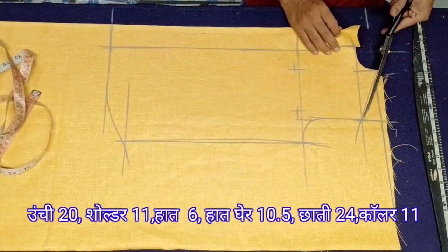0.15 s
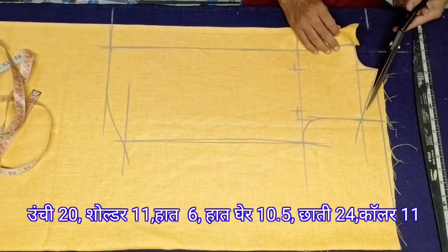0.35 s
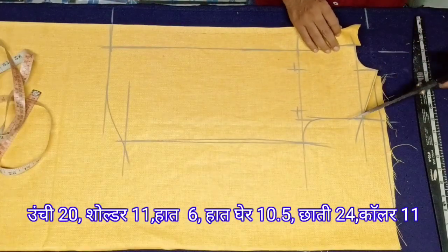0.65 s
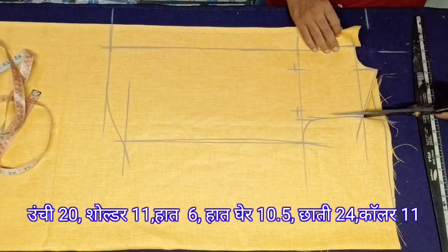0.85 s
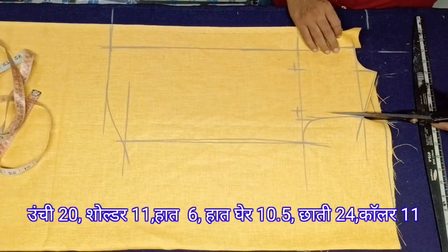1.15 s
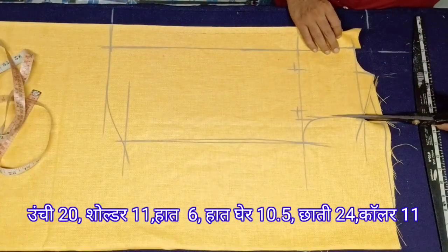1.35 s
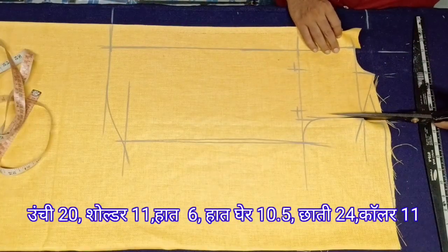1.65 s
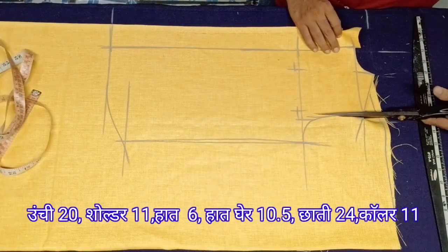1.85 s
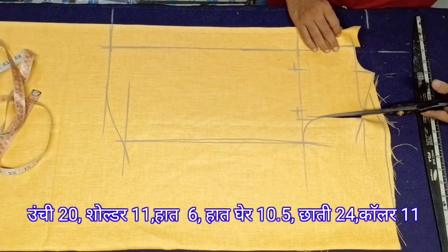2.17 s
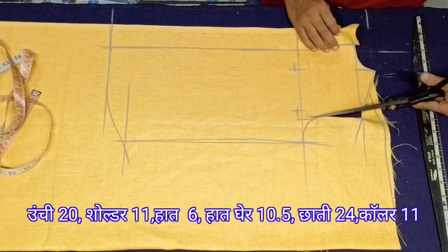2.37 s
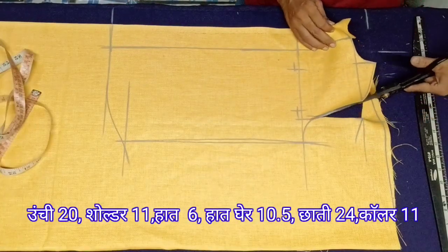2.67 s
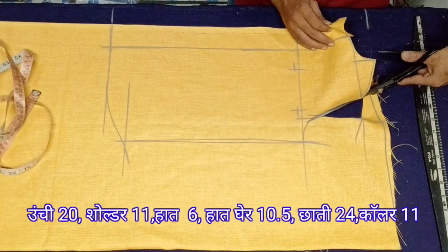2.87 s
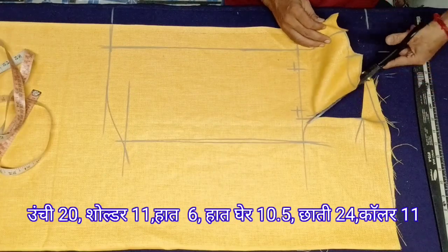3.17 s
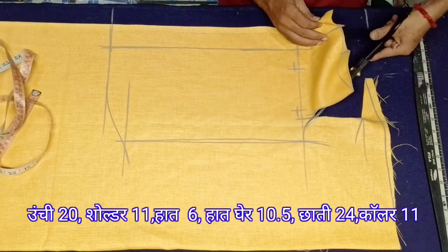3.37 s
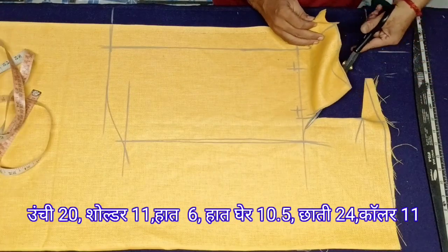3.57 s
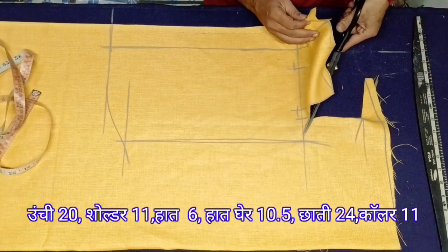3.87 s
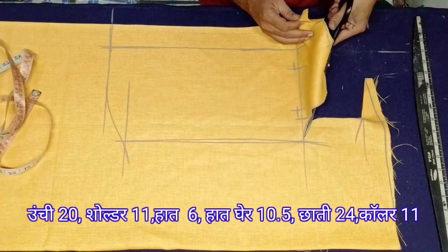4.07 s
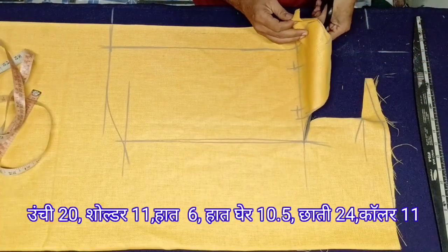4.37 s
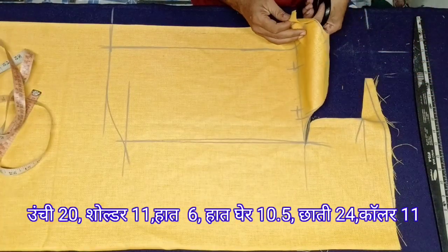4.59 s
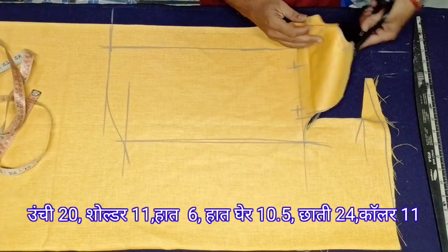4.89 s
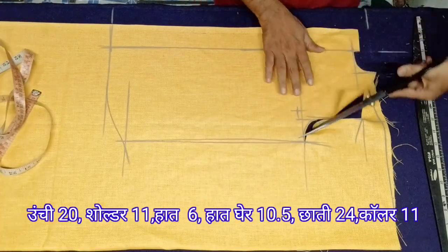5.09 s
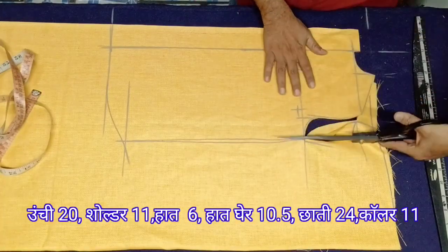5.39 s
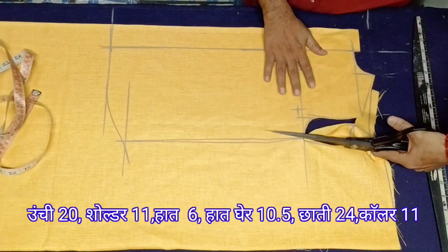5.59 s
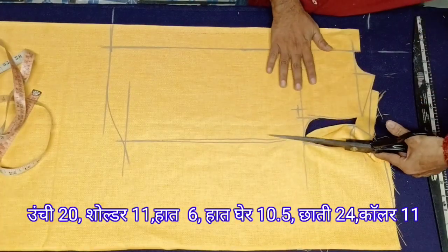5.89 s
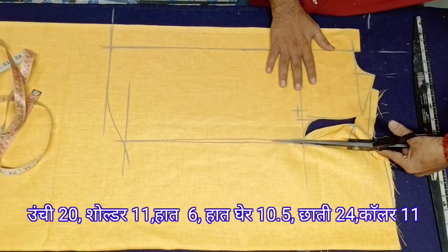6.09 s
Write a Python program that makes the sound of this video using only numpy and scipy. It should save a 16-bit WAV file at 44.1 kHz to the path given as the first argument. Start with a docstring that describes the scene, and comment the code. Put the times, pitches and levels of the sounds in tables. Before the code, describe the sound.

Large shears crunch through cloth on a wooden table, about two snips a second, with blade scrapes and low knocks.

```python
"""Crunching snips, about two a second: large tailor's shears cut cloth on a wooden table in a small room.
Threads snap in bunches and ring the blades and the board under them; the shears knock shut and
scrape open again. The table rumbles and a hollow rub swells as shears and hands move on it.
The second snip leaves a noisy tail; then a swirling wash, probably a passing vehicle, comes and
goes over faint room tone."""
import sys
import numpy as np
from scipy import signal
from scipy.fft import rfft, irfft
from scipy.io import wavfile
from scipy.ndimage import uniform_filter1d, map_coordinates

SR = 44100
rng = np.random.default_rng(int(sys.argv[2]) if len(sys.argv) > 2 else 0)


def int16_out(signal):
    """Quantize to a 16-bit WAV file."""
    q = np.round(np.clip(np.atleast_2d(signal).T, -1, 1) * 32767)
    wavfile.write(sys.argv[1], SR, q.astype(np.int16))


N = 275184
T = np.arange(N) / SR
RING = T[:SR // 3]  # time axis of one short event
SQUEEZE_PEAK_S, USUAL_BITE_HZ = 0.06, 555

# modes of the wooden table top: f/Hz, level/dB, t60/s
BOARD_MODES = [(161, -1.5, 0.15), (228, -5.5, 0.061), (317.4, 0.5, 0.16), (386.2, 2, 0.1),
               (538.4, -2.5, 0.088), (605, 4, 0.075), (653.4, -2.5, 0.12), (818, -2.5, 0.051),
               (859, -8, 0.066), (920, -5, 0.14), (989.4, 3, 0.079), (1083, 3.5, 0.0248),
               (1497, -10, 0.022)]
# modes of the steel blades: f/Hz, level/dB, t60/s
BLADE_MODES = [(2130, -7.5, 0.14), (2423, 10, 0.021), (2680, -1, 0.078), (3446, 6.5, 0.043),
               (3820, 11, 0.019), (4400, 4, 0.052), (4860, 0, 0.04), (5330, 7.5, 0.028), (5720, 3.5, 0.083),
               (7050, 7.5, 0.016), (7100, -2, 0.0093)]


def undb(db):
    """Decibels to gain."""
    return 10 ** (np.asarray(db) / 20)


def unit(x):
    """Scale to rms 1."""
    return x / np.sqrt(np.mean(x ** 2))


def punch(x):
    """Scale so that the loudest hundredth of a second has rms 1."""
    return x / np.sqrt(uniform_filter1d(x ** 2, SR // 100).max())


def add(out, s, x):
    """Mix x into out at time s."""
    i = int(s * SR)
    x, i = x[max(-i, 0):], max(i, 0)
    out[i:i + len(x)] += x[:N - i]


def gains(rows):
    """One gain curve for each level column; they fade in before the first row."""
    s, *columns = np.transpose(rows)
    fade_db = -90 * np.maximum(s[0] - T, 0)
    return [undb(np.interp(T, s, db) + fade_db) for db in columns]


def walk(per_s):
    """Slow random wandering with a spread near 1."""
    count = int(T[-1] * per_s) + 2
    return np.interp(T * per_s, np.arange(count), rng.standard_normal(count))


def colour(x, points, size=4096):
    """Minimum-phase EQ through points of f/Hz, level/dB."""
    hz, db = np.transpose(points)
    curve_db = np.interp(np.log(np.fft.rfftfreq(size, 1 / SR) + 1), np.log(hz), db)
    cepstrum = irfft(np.log(undb(curve_db)))
    cepstrum[1:size // 2] *= 2
    cepstrum[size // 2 + 1:] = 0
    return signal.fftconvolve(x, irfft(np.exp(rfft(cepstrum))))[:len(x)]


def band(x, lo_hz, hi_hz, order=2):
    """Band-pass."""
    sos = signal.butter(order, [lo_hz, min(hi_hz, SR / 2 - 1)], "band", fs=SR, output="sos")
    return signal.sosfilt(sos, x)


def ring(push, modes, scatter_db, detune=0.0069):
    """Ring the modes; each place of contact weights and detunes them anew."""
    hz, db, t60 = np.transpose(modes)[:, :, None]
    hz = hz * (1 + detune * rng.standard_normal(hz.shape))
    weight = undb(db + scatter_db * rng.standard_normal(hz.shape)) * rng.choice([-1, 1], hz.shape)
    response = np.sum(weight * np.sin(2 * np.pi * hz * RING) * 1000 ** (-RING / t60), axis=0)
    return signal.fftconvolve(push, response)[:len(push)]


def room(x, t60_s=0.18, wet_db=-9.5):
    """Direct sound and the short tail of a small room, which swallows the highest treble."""
    tail = band(rng.standard_normal(len(RING)), 14, 9700) * undb(-60 * RING / t60_s) * (RING > .004)
    return x + undb(wet_db) * signal.fftconvolve(x, tail / np.linalg.norm(tail))[:len(x)]


def slips(force, per_s, scatter_db):
    """Tiny releases of tension at random moments, sized by the force."""
    size = len(force)
    impulses = (rng.random(size) < per_s / SR) * rng.choice([-1, 1], size)
    return force * impulses * undb(scatter_db * rng.standard_normal(size))


def stroke(length, rise_s, fall_s, t=RING):
    """Envelope of a short slide: it swells, holds and dies away."""
    return (1 - np.exp(-(t / rise_s) ** 2)) * np.exp(-np.maximum(t - length, 0) / fall_s)


def squeeze(width_s, peak_s=SQUEEZE_PEAK_S):
    """Force that mounts and gives way, as when threads bunch up between the edges."""
    return 1 / np.cosh(np.minimum(np.abs(RING - peak_s) / width_s, 20))


def steel(snaps, blade_db):
    """Snaps crack in the air and ring the blades; harder ones crack brighter."""
    # spectrum of a snap: f/Hz, level/dB
    snap_eq = [(700, 3.5), (1300, 3.5), (1800, -10), (2400, 5.5), (3050, -15.5), (3800, -1.5), (5500, -5),
               (7000, 2), (7900, -16.5), (8700, -9.5), (10900, -11.5), (13000, -24.5), (14800, -29)]
    top_hz = 13000 * undb(0.81 * (blade_db + 46.5))
    crack = band(colour(snaps, snap_eq), 350, top_hz, order=4)
    blades = ring(snaps, BLADE_MODES, scatter_db=5.5, detune=.004)
    return undb(blade_db) * punch(room(unit(blades) + undb(4) * unit(crack)))


def bite(cut, tug, board_db, blade_db, hz):
    """Snapping threads ring the steel; their tugs shake the board, damped by the lower blade."""
    damped_modes = [(f, db, t60 * 0.9) for f, db, t60 in BOARD_MODES]
    wood = ring(slips(tug, per_s=1800, scatter_db=1), damped_modes, scatter_db=5.5)
    board = punch(room(band(wood, hz * 0.66, hz * 1.576, order=3)))
    body_db = -9.5 - 18.5 * np.log2(hz / USUAL_BITE_HZ)  # brighter bites have less low end
    body = undb(body_db) * punch(band(wood, 59, 207, order=3))
    snaps = slips(cut, per_s=2600, scatter_db=2.5)
    return undb(board_db) * (board + body) + steel(snaps, blade_db)


def sing(rub, tilt_db=0, rise_per_s=0.58):
    """Light contact of the edges rings the high modes, which rise in pitch as the contact travels."""
    # high blade modes, run twice in series: f/Hz, level/dB, t60/s
    high_modes = [(6294, 2, 0.014), (6800, 1.5, 0.011), (9830, -2, 0.012), (10510, 6, 0.0052)]
    tilted = [(hz, db + tilt_db * np.log2(hz / high_modes[0][0]), t60) for hz, db, t60 in high_modes]
    edge = ring(rub, high_modes, scatter_db=1, detune=0.004)
    rung = ring(edge, tilted, scatter_db=1, detune=0.004)
    quickening_time = RING + rise_per_s * RING ** 2 / 2
    return punch(map_coordinates(rung, [quickening_time * SR]))


def cutting(bite_s=0.017):
    """The edges sing and crunch through single threads; bunches of threads give way in hard bites."""
    # the shears close: t/s, closing time/s, board/dB, blades/dB, singing/dB, its tilt/(dB per octave)
    closings = [(-.02, 0.086, -37.5, -51.5, -71, 7), (1.328, 0.2, -39, -62, -57.5, 13),
                (1.928, 0.11, -44.5, -65, -75.5, 10), (2.408, 0.091, -45, -54.5, -67, -11),
                (2.912, 0.11, -45.5, -60, -67, -5), (3.41, 0.13, -60, -58.5, -68, -4),
                (3.93, 0.12, -47, -60.5, -66, -6), (4.379, 0.068, -48.5, -57.5, -76, -2),
                (5.934, 0.18, -45, -64.5, -55, -12)]
    # bunches of threads give way: t/s, board/dB, blades/dB, board brightness/Hz
    bites = [(.035, -56, -52.5, 486), (.069, -28, -42.5, 554), (1.372, -41, -65, 505),
             (1.443, -36.5, -53, 570), (1.489, -33.5, -48.5, 520), (1.519, -31.5, -43.5, 478),
             (1.95, -38.5, -64, 716), (1.994, -39, -53, 640), (2.038, -33, -48, 607),
             (2.065, -40.5, -50, 570), (2.475, -39, -50.5, 695), (2.529, -34.5, -44.5, 576),
             (2.951, -42.5, -51.5, 553), (3.008, -43, -48, 466), (3.037, -39, -48.5, 440),
             (3.46, -46, -52.5, 577), (3.515, -47, -47.5, 599), (3.545, -43, -47, 507),
             (3.99, -38, -49, 570), (4.039, -34, -44, 538), (4.457, -32.5, -43, 500),
             (4.479, -30.5, -44.5, 434), (5.965, -39, -56, 693), (5.982, -48.5, -70, 1750),
             (6.005, -41.5, -55, 550), (6.046, -37, -50, 594), (6.091, -39, -42, 600)]
    out = np.zeros(N)
    for s, closing_s, board_db, blade_db, singing_db, tilt_db in closings:
        force = stroke(closing_s, rise_s=0.02, fall_s=0.021)
        contact = stroke(closing_s * 0.51, rise_s=0.0069, fall_s=0.016)
        rub = slips(contact, per_s=6000, scatter_db=8.5)
        crunch = bite(force, force, board_db, blade_db, USUAL_BITE_HZ)
        add(out, s, crunch + undb(singing_db) * sing(rub, tilt_db))
    for s, board_db, blade_db, hz in bites:
        cut = squeeze(bite_s * 0.28)
        tug = squeeze(bite_s * 0.26, peak_s=SQUEEZE_PEAK_S - .006)  # just ahead of the cut
        add(out, s - SQUEEZE_PEAK_S, bite(cut, tug, board_db, blade_db, hz))
    return out


def room_tone(level_db=-73.5):
    """A faint, steady bed of dark noise."""
    # spectrum of the room's air: f/Hz, level/dB
    air_eq = [(30, -4), (250, -6), (700, -15), (1500, -18), (2500, -29), (9000, -38), (15000, -39)]
    return undb(level_db) * unit(colour(rng.standard_normal(N), air_eq))


def knocks():
    """The handles meet with a click and press the closed shears on the padded table."""
    # the shears knock shut: t/s, thud/dB, brightness/Hz, steel click/dB
    hits = [(0.102, -20.5, 263, -48), (1.53, -39, 310, -52.5), (3.04, -40.5, 209, -74),
            (4.053, -36.5, 394, -64), (4.486, -29, 230, -70), (6.099, -39, 204, -67)]
    out = np.zeros(N)
    for s, db, hz, click_db in hits:
        push = RING * np.exp(-RING / 0.001)
        thud = band(ring(push, BOARD_MODES, scatter_db=2), hz * .5, hz * 2.6)
        chatter = slips(stroke(.002, rise_s=0.00098, fall_s=0.0044), per_s=4600, scatter_db=3)
        add(out, s, undb(db) * punch(room(thud)) + steel(chatter, click_db))
    return out


def table_rumble():
    """Steel sticks and slips on the cloth and stirs the low modes; thumps sway the whole top."""
    # the shears are shoved over the padded table: t/s, length/s, level/dB
    shoves = [(2.818, 0.18, -50), (3.221, 0.16, -47), (3.513, 0.18, -45), (3.9, 0.22, -52.5),
              (4.496, 0.098, -49)]
    # low thumps of the table (the first knock's boom, then hands leaning): t/s, level/dB
    thumps = [(0.13, -45), (1.567, -54), (2.619, -45), (3.294, -45.5), (3.852, -47), (5.059, -56)]
    low_modes = [(113.4, 3.5, 0.14), (144.3, 5.0, 0.29), (224.4, -12, 0.084)]  # f/Hz, level/dB, t60/s
    judder = slips(np.ones(N), per_s=220, scatter_db=5.5)
    drag = ring(judder, low_modes, scatter_db=3.5)
    speed = sum(undb(db) * stroke(length, rise_s=0.0043, fall_s=0.1, t=np.maximum(T - s, 0))
                for s, length, db in shoves)
    out = speed * unit(band(drag, 38, 260))
    for s, db in thumps:
        push = slips(squeeze(width_s=0.11), per_s=1000, scatter_db=2.5)
        sway = band(ring(push, [(58.3, 0, 0.25)], scatter_db=0), 83, 180)
        add(out, s - SQUEEZE_PEAK_S - .03, undb(db) * punch(sway))
    return out


def blade_echoes(rub, echo_s=.00178, shrink_per_s=0.78, reflect=0.64):
    """A rub echoes along the blade, ever sooner as the contact travels."""
    lag = echo_s * np.exp(-shrink_per_s * RING)
    return sum(reflect ** k * map_coordinates(rub, [(RING - k * lag) * SR]) for k in range(4))


def scraping():
    """Edge rubs on edge and makes the steel sing, while the lower blade is pushed over the table."""
    # the blades open or shift: t/s, scrape/dB, singing/dB, board/dB, length/s
    slides = [(0.276, -46.5, -66, -48, 0.02), (0.561, -75, -94.5, -67.5, 0.06),
              (1.303, -90, -75, -60.5, 0.0055), (1.641, -55, -71.5, -43, 0.04),
              (2.196, -70, -100, -50, 0.053), (2.677, -66, -85, -48.5, 0.024),
              (3.175, -69, -78.5, -54.5, 0.015), (3.668, -73, -76, -55.5, 0.012),
              (4.107, -69, -96, -48.5, 0.098), (4.693, -54.5, -69.5, -51, 0.0045),
              (5.804, -79, -70, -64.5, 0.12), (6.195, -49.5, -57.5, -60.5, 0.022)]
    # spectrum of edge on edge: f/Hz, level/dB
    scrape_eq = [(1200, -21.5), (2300, 18), (2850, 15), (3150, 1), (3500, 11.5), (4300, 5), (5650, 18.5),
                 (6250, 10.5), (6700, 9), (7600, -17), (10700, -8), (13000, -61)]
    # hollow colour of the board under a sliding blade: f/Hz, level/dB
    hollow_eq = [(220, -20.5), (410, -2), (520, -6), (860, -1), (1300, -31.5)]
    out = np.zeros(N)
    for s, scrape_db, singing_db, board_db, length in slides:
        rub = slips(stroke(length * .7, rise_s=.015, fall_s=.016), per_s=1800, scatter_db=4)
        rasp = unit(blade_echoes(colour(rub, scrape_eq)))
        blades = unit(ring(rub, BLADE_MODES, scatter_db=12))
        scrape = punch(room(rasp + undb(-14) * blades))
        push = slips(stroke(length, rise_s=0.013, fall_s=0.018), per_s=2000, scatter_db=6.5)
        wood = ring(push, BOARD_MODES, scatter_db=2, detune=0.032)
        board = punch(room(colour(wood, hollow_eq)))
        add(out, s, undb(scrape_db) * scrape + undb(singing_db) * sing(rub) + undb(board_db) * board)
    return out


def hollow_rub(core_hz=45, skirt_hz=180, broadens_db=-54):
    """A half-whistling rub: noise in one resonance that broadens as it grows louder."""
    # probably shears and cloth sliding over each other: t/s, level/dB, resonance/Hz
    glide = [(.38, -78.5, 1415), (0.509, -70, 1440), (.66, -60, 1462), (0.756, -58, 1468),
             (0.802, -64.5, 1463), (1.04, -83.5, 1460), (1.228, -62.5, 1493), (1.451, -52, 1564),
             (1.72, -76.5, 1243), (1.83, -58, 1110), (1.95, -87, 1100), (3.201, -65.5, 1182),
             (3.48, -56.5, 1577), (3.662, -62, 1405), (3.899, -67, 1036), (5.202, -100, 1486),
             (5.45, -76.5, 1463), (5.951, -86, 1468)]
    s, _, hz = np.transpose(glide)
    gain, = gains([row[:2] for row in glide])
    carrier = np.cos(2 * np.pi * np.cumsum(np.interp(T, s, hz)) / SR)
    core = unit(carrier * band(rng.standard_normal(N), 0.79, core_hz))
    skirt = unit(carrier * band(rng.standard_normal(N), 0.79, skirt_hz, order=4))
    breadth = np.sqrt(gain / undb(broadens_db))
    return gain * (core + breadth * skirt) / np.hypot(1, breadth)


def patchy(x, spread_db=3, per_s=9):
    """Each half octave swells and sinks on its own."""
    spectrum = rfft(x)
    half_octave = 2 * np.log2(np.fft.rfftfreq(N, 1 / SR) + 1)
    bands = (irfft(spectrum * np.maximum(1 - abs(half_octave - k), 0), N) for k in range(15, 28))
    return sum(undb(spread_db * walk(per_s)) * part for part in bands)


def swirling_wash(nearest_s=3.266, passing_s=1.465):
    """Noise swells in patches and swirls as dull echoes off ground and walls slide in delay."""
    # the second snip's noisy tail, then a wash, probably a passing vehicle: t/s, roar/dB, hiss/dB
    levels = [(1.6, -55, -70), (1.72, -55.5, -100), (2.0, -72.5, -66.5), (2.2, -58.5, -68.5),
              (2.65, -56.5, -62), (3.27, -53.5, -66.5), (3.62, -53, -60), (4.15, -54.5, -68.5),
              (4.58, -57.5, -65.5), (4.78, -72.5, -77.5), (5.8, -75, -89)]
    # spectrum of the wash: f/Hz, level/dB
    wash_eq = [(290, 7), (470, -8), (850, -0.5), (1500, -10), (2200, -12), (4000, -5), (6000, -14),
               (7500, -52.5)]
    roar_gain, hiss_gain = gains(levels)
    wash = patchy(colour(rng.standard_normal(N), wash_eq))
    nearness = 1 / np.hypot(1, (T - nearest_s) / passing_s)
    for share, lag_s in [(.7, .0012), (.55, .003)]:
        lag = lag_s * nearness * (1 + .08 * walk(per_s=4))
        wash = wash + share * map_coordinates(band(wash, 20, 2400), [(T - lag) * SR])
    roar = unit(band(wash, 230, 2300, order=3))
    hiss = unit(band(wash, 1786, 9950, order=5))
    return roar_gain * roar + hiss_gain * hiss


def scene():
    """The mono mix, as heard from above the table."""
    return (cutting() + knocks() + scraping() + hollow_rub() + table_rumble() + swirling_wash()
            + room_tone())[None]


def record(dry, top_hz=15500):
    """A steep low-pass takes off the highest treble."""
    return signal.sosfilt(signal.ellip(8, .2, 70, top_hz, fs=SR, output="sos"), dry)


dry = scene()
out = record(dry)
int16_out(out)
```